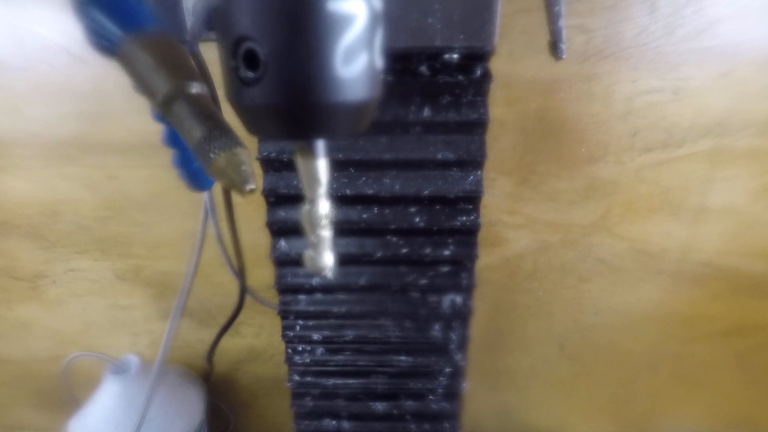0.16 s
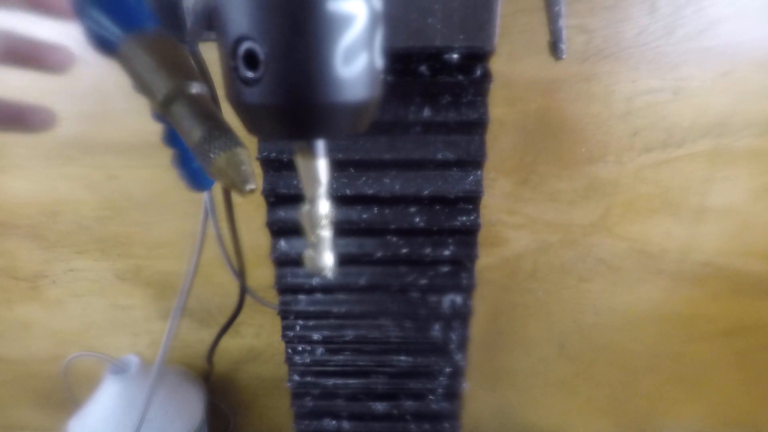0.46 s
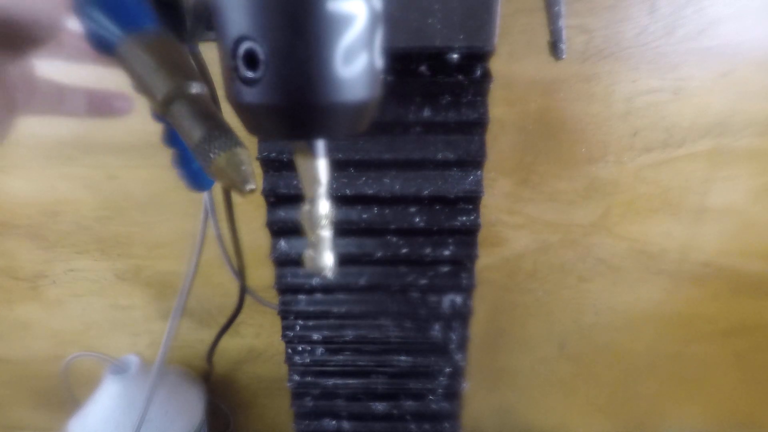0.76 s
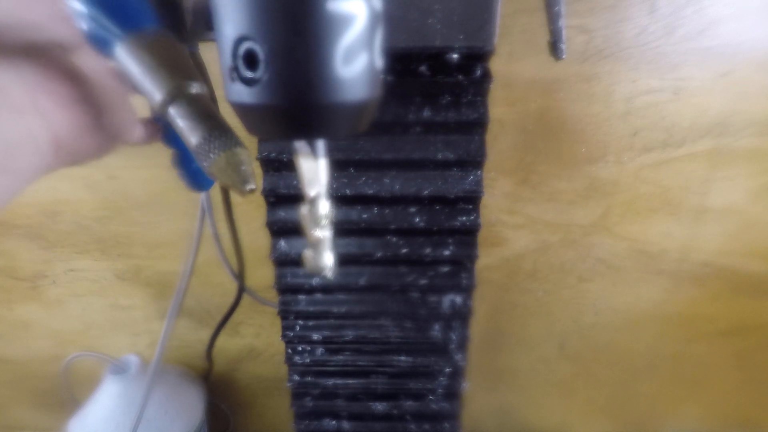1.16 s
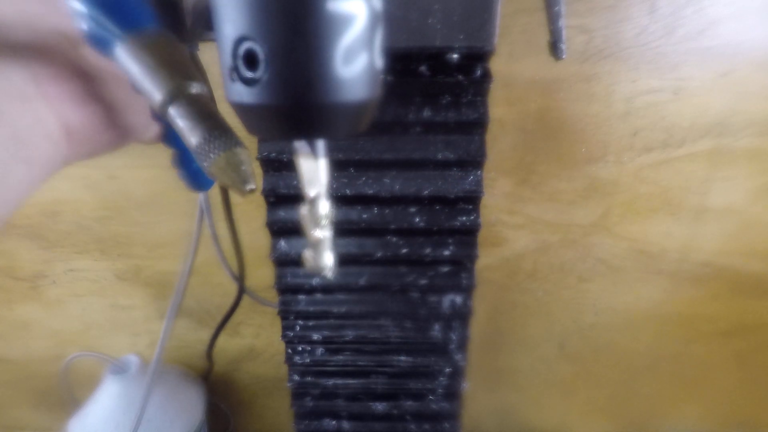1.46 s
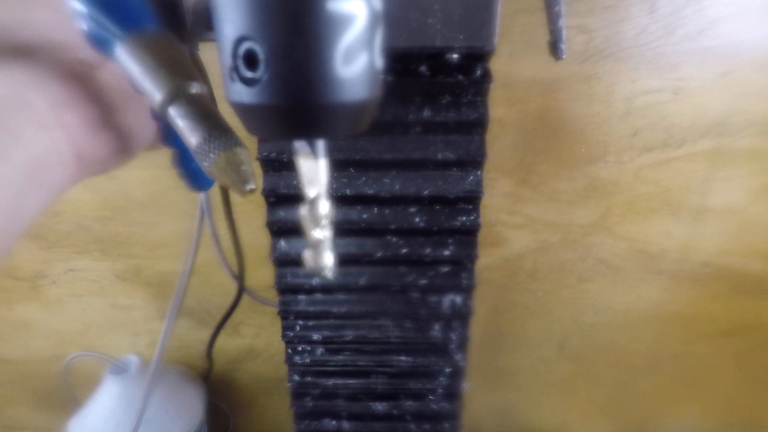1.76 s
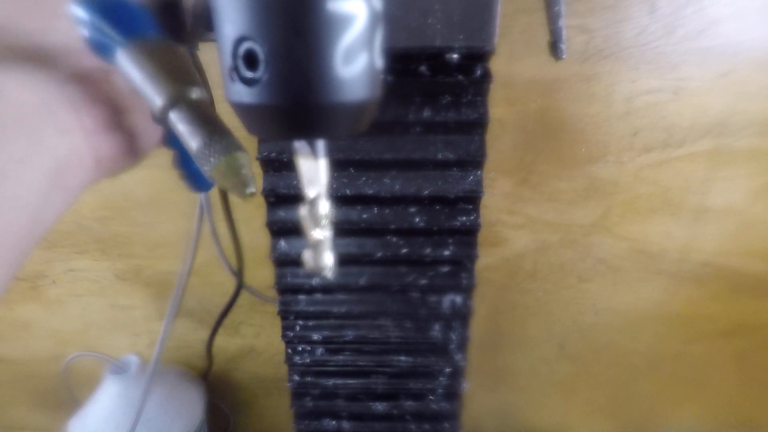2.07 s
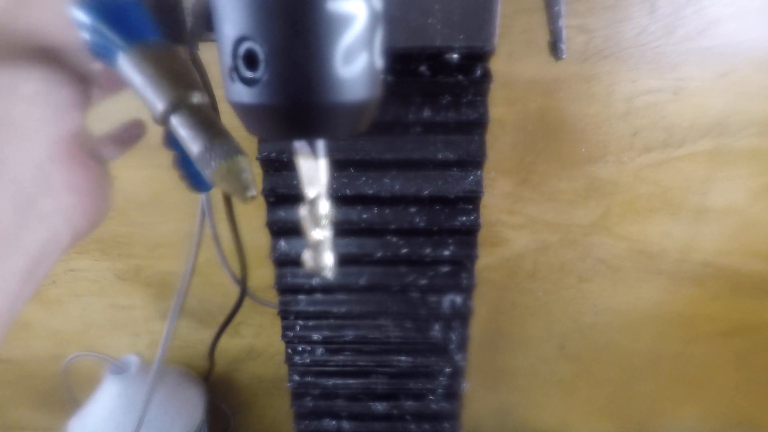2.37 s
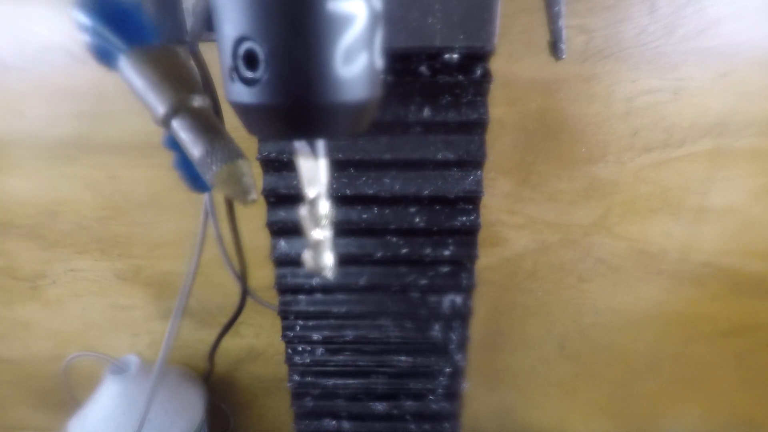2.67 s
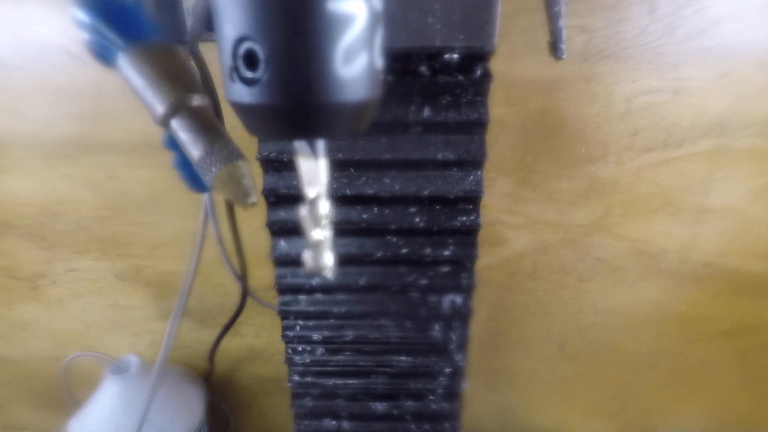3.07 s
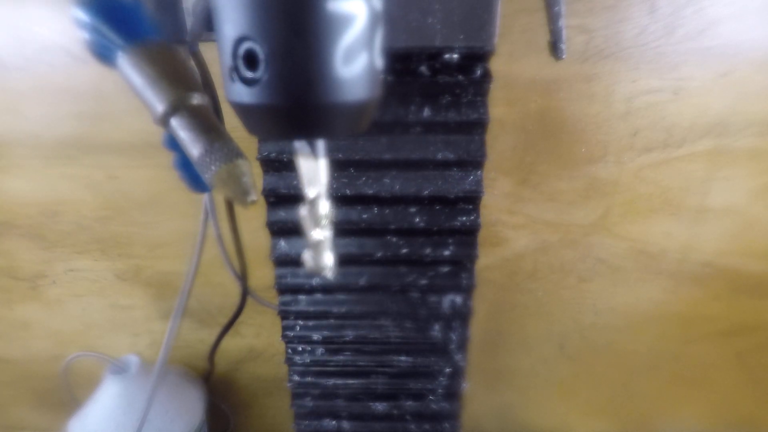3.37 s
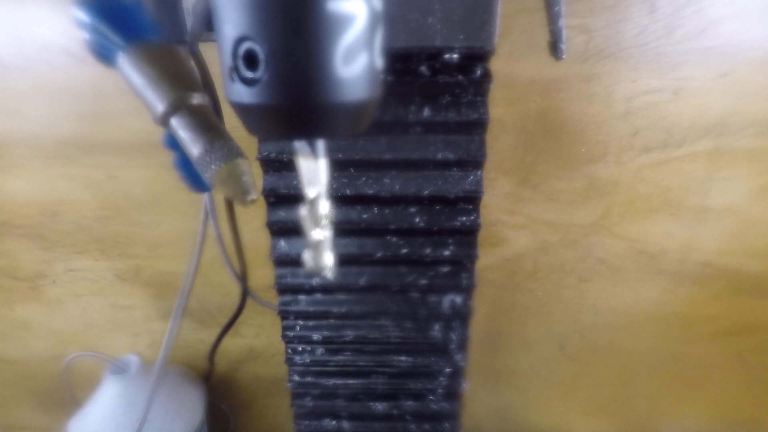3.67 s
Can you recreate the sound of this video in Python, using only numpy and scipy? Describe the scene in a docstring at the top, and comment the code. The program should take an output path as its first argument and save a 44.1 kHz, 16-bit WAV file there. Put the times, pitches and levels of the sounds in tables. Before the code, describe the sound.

Close to a milling machine, an idle low hum wavers for almost two seconds, then a valve opens softly and a mist jet hisses, thin at first, soon wide and full, with hum stronger on the right.

```python
"""In a workshop, a milling machine idles: mains hum, a spindle tone beating against it, and rushing noise.
A valve opens with a soft thump and a coolant mist nozzle hisses, first thin and nearly centred.
Soon the sound opens out: the hiss turns wide and fuller, and the mains hum swells, mostly on the right.
Hisses and rush are noise shaped over frequency; hums, tones and thumps are sine waves."""
import sys
import numpy as np
from scipy.fft import rfft, irfft
from scipy.io import wavfile

SR = 44100
rng = np.random.default_rng(int(sys.argv[2]) if len(sys.argv) > 2 else 0)


def store_wav(level_fs):
    """Save 16-bit WAV to argv[1]."""
    pcm = np.round(np.clip(np.atleast_2d(level_fs), -1, 1) * 32767)
    wavfile.write(sys.argv[1], SR, pcm.T.astype(np.int16))


N = 167580   # length in samples
T = np.arange(N) / SR   # time in seconds
FREQS = np.maximum(np.arange(N // 2 + 1) * SR / N, 1)   # Hz, kept above 0 for the logarithm

CRACK_S, OPEN_S = 1.883, 1.901   # the valve leaks, then opens fully
WIDEN_S, WIDEN_TIME_S = 2.25, 0.26   # when the sound opens out, and its time constant
MAINS_HZ = 119.95
ECHO_COUNT, ECHO_SPAN_S, ECHO_SHARE = 30, 0.018, 0.24   # reflections off the table and the machine


def from_db(db):
    """Turn decibels into a gain."""
    return 10 ** (np.asarray(db) / 20)


def at_hz(table, hz, axis=1):
    """Read one column of a table, joining its rows by straight lines over log frequency."""
    table = np.array(table)
    return np.interp(np.log(hz), np.log(table[:, 0]), table[:, axis])


def drift(rate):
    """Slow random motion of spread 1, mostly slower than the rate in Hz."""
    slow = irfft(rfft(rng.standard_normal(N)) / (1 + (FREQS / rate) ** 2), N)
    return slow / slow.std()


def noise(db):
    """Spectrum of random noise with the given density in dB per Hz."""
    return rfft(rng.standard_normal(N)) * from_db(db) * np.sqrt(SR / 2)


def ramp(start, length):
    """Rise in a straight line from 0 to 1."""
    return np.clip((T - start) / length, 0, 1)


def dying(start, time_constant):
    """Stay at 1 until the start, then fall exponentially."""
    return np.exp(-np.maximum(T - start, 0) / time_constant)


def reflections():
    """Response of the direct path plus short random echoes from nearby surfaces, scaled to about power 1."""
    draws = rng.random((ECHO_COUNT, 2))
    delays = (draws[:, 0] + 1 / 20) * ECHO_SPAN_S
    echoes = np.zeros(N)
    echoes[(delays * SR).astype(int)] = draws[:, 1] - 0.5
    echo_response = rfft(echoes) / np.linalg.norm(echoes)
    return (1 + ECHO_SHARE * echo_response) / np.sqrt(1 + ECHO_SHARE ** 2)


LEAK_DB, VALVE_RISE_S = -10.5, 0.003
# the first hiss starts louder, holds, then sinks
LOUDER_DB, LOUD_HOLD_S, LOUD_DECAY_S, SETTLED_DB = 6.5, 0.084, 0.23, -4.5
THIN_END_S, THIN_FADE_S = 2.3, 0.29   # the early hiss starts to fade, with this time constant
# the top of the early hiss: a little wider, sinking evenly from its level at the opening
SIZZLE_HZ, SIZZLE_DB, SIZZLE_SAG_DB_PER_S, SIZZLE_SIDE = 11300, 2.5, 10, 0.45
PUFF_DB, PUFF_HZ, PUFF_DECAY_S = -66, 380, 0.06   # gust of first air: dB per Hz, upper edge, time constant
# Tone colour of the early hiss, before valve and loudness act on it.
# Each row: frequency in Hz, noise level in dB per Hz.
THIN_HISS_COLOUR = [(400, -71), (900, -77.5), (1800, -72.5), (3000, -72.5), (3600, -67), (4250, -58.5),
                    (4900, -63.5), (6250, -56), (6900, -63.5), (7300, -63), (8000, -69.8), (8500, -67),
                    (10000, -73), (11200, -77), (12100, -60.5), (13300, -57.5), (15200, -63)]


def thin_hiss():
    """The jet leaks, starts loud with a low puff, then settles and gives way to the wide hiss."""
    valve = from_db(LEAK_DB) * ramp(CRACK_S, VALVE_RISE_S)
    valve = valve + (1 - valve) * ramp(OPEN_S, VALVE_RISE_S)
    loudness = from_db(SETTLED_DB + LOUDER_DB * dying(OPEN_S + LOUD_HOLD_S, LOUD_DECAY_S))

    colour_db = at_hz(THIN_HISS_COLOUR, FREQS)
    mid = noise(colour_db) * reflections()
    side = noise(colour_db) * reflections()
    top = FREQS > SIZZLE_HZ
    body = irfft(mid * ~top, N) * loudness * dying(THIN_END_S, THIN_FADE_S)

    # the side noise is added on the left and subtracted on the right
    left_right = mid + SIZZLE_SIDE * side * [[1], [-1]]
    sizzle_gain = from_db(SIZZLE_DB - SIZZLE_SAG_DB_PER_S * (T - OPEN_S))
    sizzle = irfft(top * left_right, N) * sizzle_gain

    puff = irfft(noise(PUFF_DB) / (1 + (FREQS / PUFF_HZ) ** 4), N) * dying(OPEN_S, PUFF_DECAY_S)
    return valve * (body + sizzle + puff)


WIDE_DB = 0.84   # extra level of the whole wide hiss
# Basic tone colour of the wide hiss on each side, before resonances and extra level.
# Each row: frequency in Hz, left level in dB per Hz, right level in dB per Hz.
WIDE_HISS_COLOUR = [(190, -71.5, -62), (440, -70, -79), (1110, -75.5, -76), (1470, -72, -69),
                    (1870, -70.5, -76.5), (2250, -66.5, -66.5), (3500, -65.5, -65.5), (4500, -66.5, -65.5),
                    (5220, -64, -66.5), (5570, -55.5, -56.5), (6730, -51.5, -58.5), (7700, -59, -60),
                    (8700, -68, -60), (10200, -69, -60.5), (11300, -70.5, -66.5), (13400, -64.5, -64.5),
                    (15100, -70, -73)]
# Resonances of the wide hiss, and two notches where the change is negative.
# Each row: centre in Hz, width in Hz, change in dB.
HISS_RESONANCES = [(430, 70, 3.5), (730, 104, 8.5), (860, 55, 5), (1920, 86, -5), (2760, 130, -3.5),
                   (3238, 200, 6), (3957, 270, 6.5), (4830, 160, 6.5), (6390, 130, 3), (6810, 150, 3),
                   (7450, 190, 6.5), (8280, 130, 3.5)]
# How alike left and right are: 1 is the same, 0 unrelated, below 0 partly opposite.
# Each row: frequency in Hz, correlation (no unit).
LEFT_RIGHT_LIKENESS = [(250, -0.46), (1000, -0.2), (1800, 0.34), (2300, 0.82), (3000, 1), (4700, 1),
                       (5500, 0.76), (6800, 0.63), (7400, .15), (9300, -0.32), (11500, 0.63), (12400, 0.5),
                       (13500, 0.99)]


def wide_hiss():
    """The steady jet, coloured by resonances and differently on each side."""
    peaks_db = 0
    for hz, width, db in HISS_RESONANCES:
        peaks_db = peaks_db + db / (1 + (2 * (FREQS - hz) / width) ** 2)

    # shared and opposite parts, mixed to give the wanted likeness
    alike = np.clip(at_hz(LEFT_RIGHT_LIKENESS, FREQS), -1, 1)
    mid = noise(peaks_db) * reflections() * np.sqrt((1 + alike) / 2)
    side = noise(peaks_db) * reflections() * np.sqrt((1 - alike) / 2)
    left = (mid + side) * from_db(at_hz(WIDE_HISS_COLOUR, FREQS))
    right = (mid - side) * from_db(at_hz(WIDE_HISS_COLOUR, FREQS, axis=2))

    low_cut = FREQS ** 2 / (FREQS ** 2 + 50 ** 2)
    hiss = irfft(np.array([left, right]) * low_cut, N)
    return hiss * from_db(WIDE_DB) * (1 - dying(WIDEN_S, WIDEN_TIME_S))


JET_FLUTTER_DB, JET_FLUTTER_HZ = 0.6, 44   # spread and rate of the level flutter


def spray():
    """Both hisses share one flutter, since they are the same jet."""
    flutter = from_db(JET_FLUTTER_DB * drift(JET_FLUTTER_HZ))
    return (thin_hiss() + wide_hiss()) * flutter


THUMP_RISE_S = 0.006
# Soft thumps, the last two from the valve.
# Each row: start in seconds, pitch in Hz, level in dB before rise and decay, time to decay 60 dB in seconds.
SOFT_THUMPS = [(1.083, 287, -31.5, 0.124), (1.879, 117, -18, 0.066), (1.921, 95, -18, .05)]


def thumps():
    """Each thump is one low, softly struck, quickly damped vibration."""
    out = np.zeros(N)
    for start, hz, db, decay_60_db in SOFT_THUMPS:
        age = np.maximum(T - start, 0)
        decay = np.exp(-np.log(1000) * age / decay_60_db)   # a factor of 1000 is 60 dB
        out += from_db(db) * ramp(start, THUMP_RISE_S) * decay * np.sin(2 * np.pi * hz * age)
    return out


SWELL_LEFT_DB, SWELL_RIGHT_DB = -22, -9.4   # rms once fully swollen
SWELL_S, SWELL_TIME_S = 2.23, 0.27   # start and time constant
SWELL_DELAY_RAD, SWELL_LAG_RAD = 1.19, 2.5   # right trails the idle hum, left trails the right


def swelling_hum():
    """The mains hum grows pure and strong on the right, weaker and nearly opposite in phase on the left."""
    phase = 2 * np.pi * MAINS_HZ * T - SWELL_DELAY_RAD
    left = from_db(SWELL_LEFT_DB + 0.43 * drift(9)) * np.sin(phase - SWELL_LAG_RAD)
    right = from_db(SWELL_RIGHT_DB + 0.074 * drift(8.7)) * np.sin(phase)
    return np.sqrt(2) * np.array([left, right]) * (1 - dying(SWELL_S, SWELL_TIME_S))


# How the machine fades in, the treble starting furthest down.
# Each row: frequency in Hz, dB missing at the start, time constant in seconds.
OPENING_FADE = [(100, 3, .3), (1500, 1.5, 0.18), (4540, 1.5, 0.22), (7000, 9, 0.2), (10000, 14, 0.18),
                (14000, 26, .48)]


def fade_in(hz):
    """Gain of the opening fade at one frequency, over time."""
    missing_db = at_hz(OPENING_FADE, hz) * dying(0, at_hz(OPENING_FADE, hz, axis=2))
    return from_db(-missing_db)


MAINS_DB, MAINS_WOBBLE_DB = -31.5, 0.1   # rms level and wobble, before fade and dip
# Tones of the spindle drive, before fade and dip.
# Each row: pitch in Hz, rms level in dB, level wobble in dB, pitch wander in Hz.
SPINDLE_TONES = [(75.2, -37.5, 0.5, 0.35), (150.1, -52, 2.5, 1.4), (227, -56, 2.5, 4),
                 (241.7, -49.5, 2.5, 2.01), (498, -61.5, 2, 16)]


def machine_tones():
    """Steady mains hum, plus spindle tones that waver in level and pitch and so beat against it."""
    mains_gain = from_db(MAINS_DB + MAINS_WOBBLE_DB * drift(8)) * fade_in(MAINS_HZ)
    out = np.sqrt(2) * mains_gain * np.sin(2 * np.pi * MAINS_HZ * T)
    for hz, db, wobble_db, wander in SPINDLE_TONES:
        phase = 2 * np.pi * np.cumsum(hz + wander * drift(4.33)) / SR
        gain = from_db(db + wobble_db * drift(9.5)) * fade_in(hz)
        out += np.sqrt(2) * gain * np.sin(phase)
    return out


DRIVE_DB, DRIVE_RISE_DB_PER_S, DRIVE_FLUTTER_DB = 0.36, 0.74, 0.4   # extra level, slow rise, flutter
# Rush of the drive and bearings, before extra level, rise, fade and dip.
# Each row: frequency in Hz, noise level in dB per Hz.
DRIVE_RUSH = [(20, -58), (60, -66.5), (150, -64.5), (280, -73), (500, -76.3), (700, -82.7), (1350, -83.5),
              (2200, -91), (3200, -98.2), (4400, -92.5), (5200, -98), (5900, -96.5), (7200, -105.9),
              (8800, -99.1), (11300, -106.2), (13500, -107.5), (15200, -116.6)]


def drive_rush():
    """Noise of the running drive, cut into bands that each fade in and flutter on their own."""
    rush = noise(at_hz(DRIVE_RUSH, FREQS) + DRIVE_DB) * reflections()
    rise_db = DRIVE_RISE_DB_PER_S * (np.minimum(T, CRACK_S) - 1.2)   # rises until the valve leaks
    edges = np.geomspace(16, 16384, 21)   # band edges in Hz, two bands per octave
    out = np.zeros(N)
    for low, high in zip(edges, edges[1:]):
        band = irfft(rush * (FREQS >= low) * (FREQS < high), N)
        flutter_db = DRIVE_FLUTTER_DB * drift(15)
        out += band * fade_in(np.sqrt(low * high)) * from_db(rise_db + flutter_db)
    return out


MACHINE_DIP_DB = 4.5   # the machine is quieter once the spray runs
MACHINE_STAYS = 0.43   # share of the centred machine that remains under the wide hiss


def machine():
    """Tones and rush together, dipping as the valve opens and receding as the sound opens out."""
    dip = from_db(-MACHINE_DIP_DB * ramp(OPEN_S, 0.029))
    centred = dying(WIDEN_S, WIDEN_TIME_S)
    return (machine_tones() + drive_rush()) * dip * (centred + MACHINE_STAYS * (1 - centred))


def scene():
    """The centred machine recedes as the wide hiss and hum take over."""
    return spray() + thumps() + swelling_hum() + machine()


CUTOFF_HZ = 15250


def record(dry):
    """Cut the very top steeply, padding with silence so that the filter does not wrap around."""
    hz = np.arange(N + 1) * SR / (2 * N)
    hz = np.minimum(hz, 1.2 * CUTOFF_HZ)   # keeps the high power below from overflowing
    cut = 1 / np.sqrt(1 + (hz / CUTOFF_HZ) ** 700)
    return irfft(rfft(dry, 2 * N) * cut, 2 * N)[:, :N]


dry = scene()
out = record(dry)
store_wav(out)
```